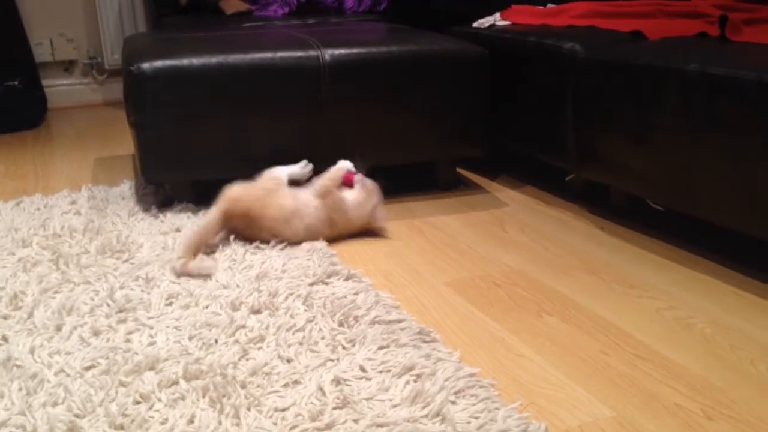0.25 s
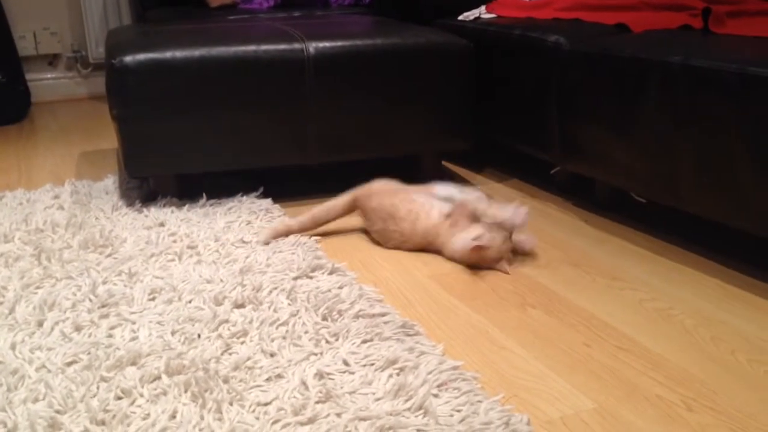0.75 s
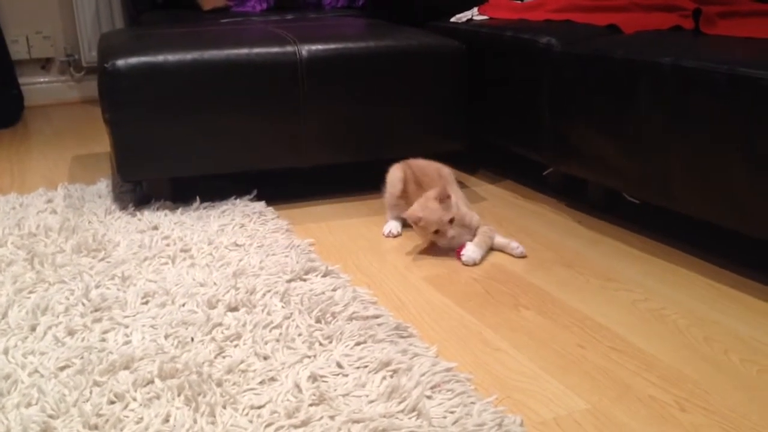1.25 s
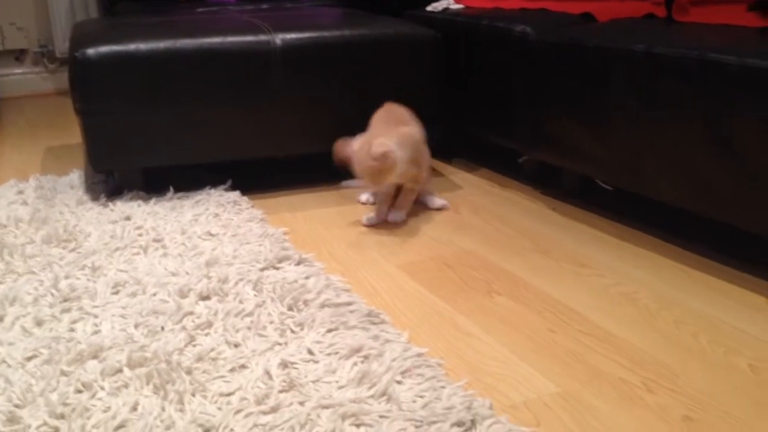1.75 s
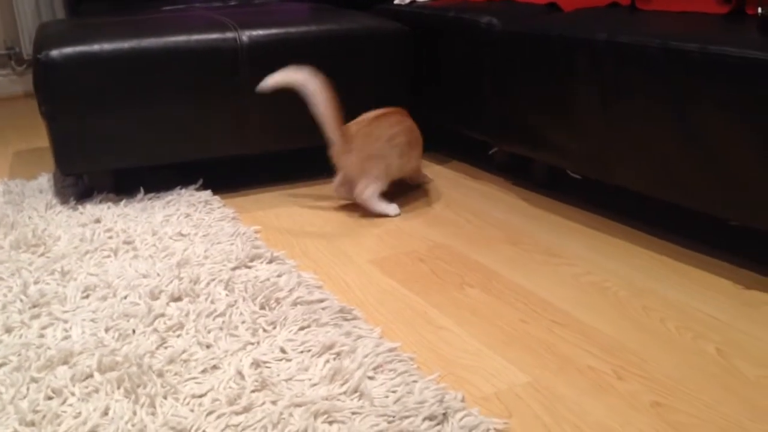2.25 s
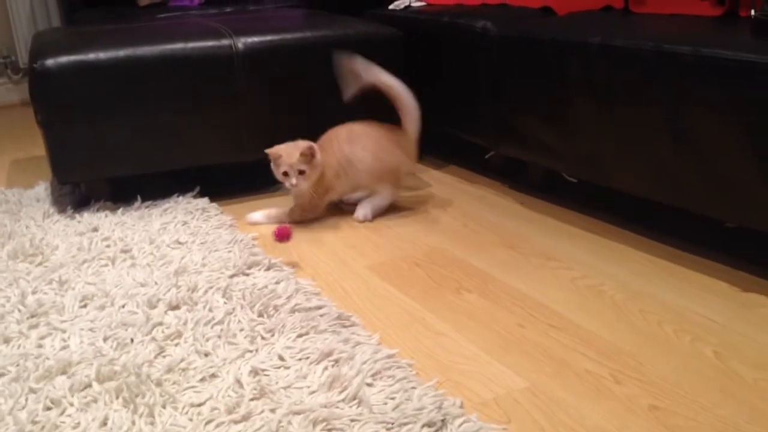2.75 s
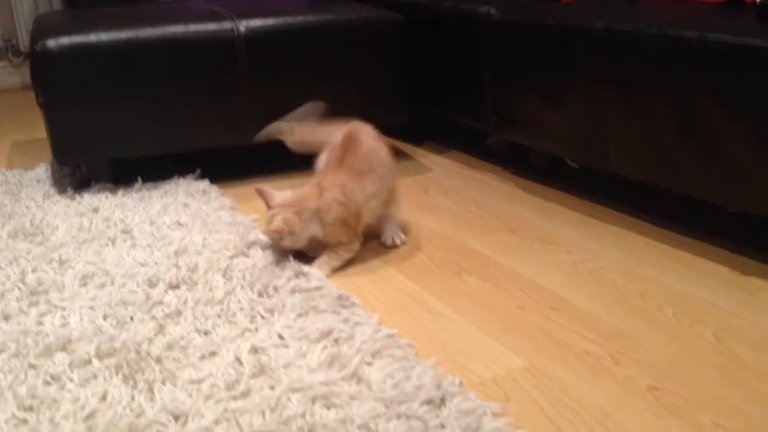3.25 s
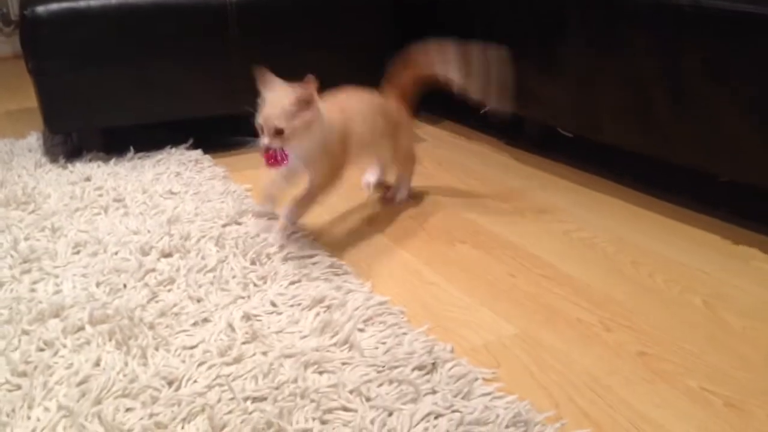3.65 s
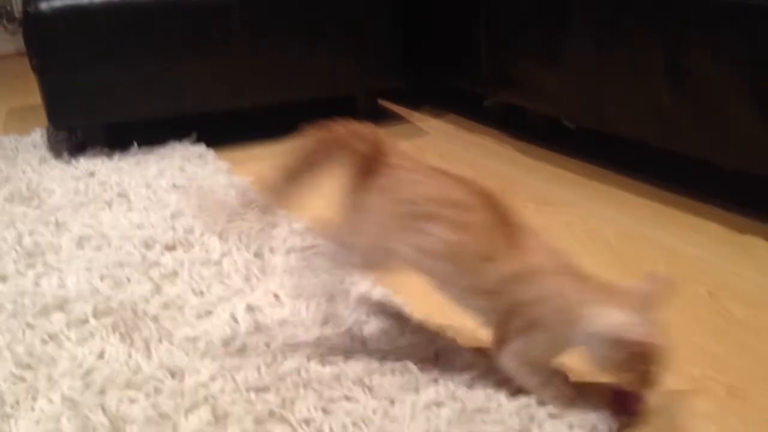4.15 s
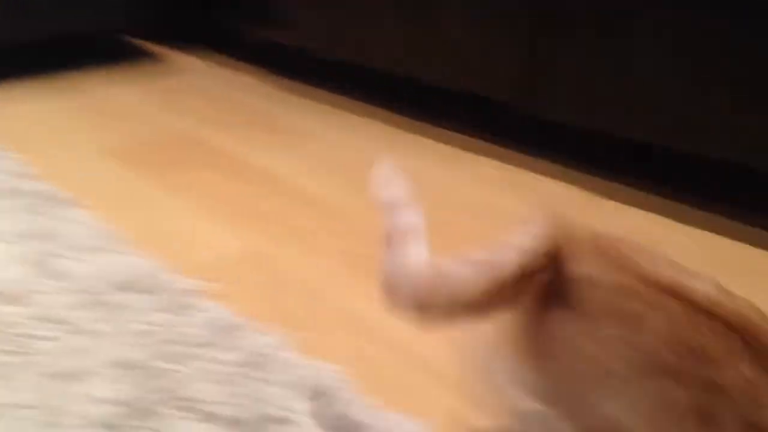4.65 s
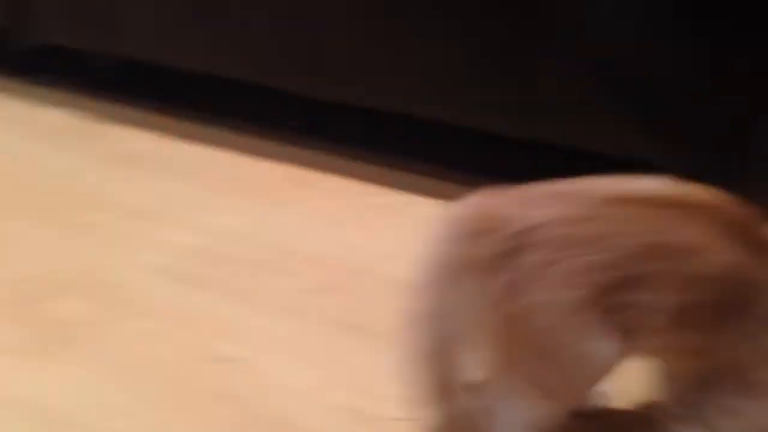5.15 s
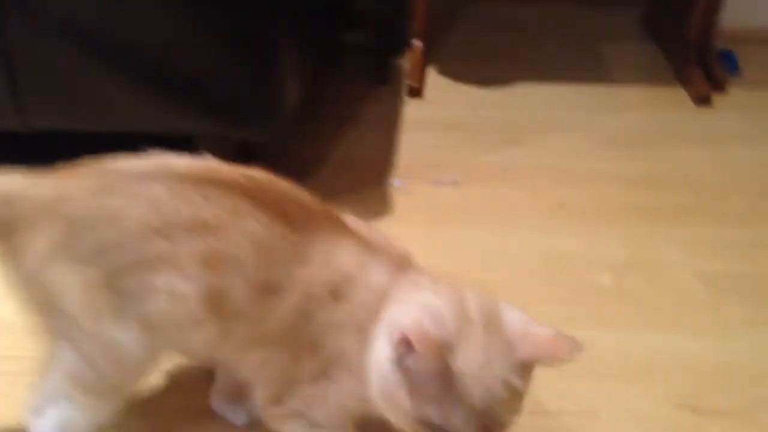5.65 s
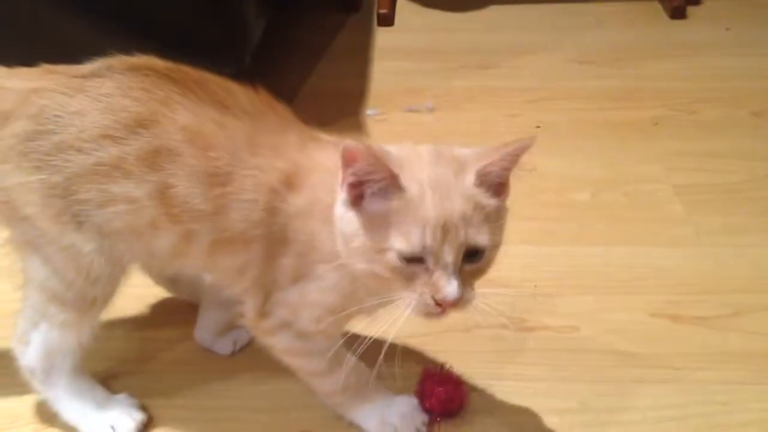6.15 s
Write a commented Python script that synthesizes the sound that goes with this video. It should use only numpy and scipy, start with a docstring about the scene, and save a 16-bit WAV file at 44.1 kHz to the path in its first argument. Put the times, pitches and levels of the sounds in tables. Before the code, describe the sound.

In a small furnished room with a short echo and faint steady hiss, a kitten scrambles on laminate. Very soft pats open, with a light slap and click near 0.4 s and a dull pat near 0.5. At 1.0 s a sharp, woody knock rings from the furniture. After a lull, claw ticks and light skids resume at 1.6-1.9, with a low thump near 2.05 and a scuff at 2.4. A bright claw snap and thud land at 2.8, a crisp click at 3.35 with a thin rasp, then strong raspy scraping around 3.6-3.75. From 4.1 to 4.8 quick hollow paw thumps, clicks and hard skids gallop closer, the room echo receding. A small knock at 5.0 precedes brighter scratches and taps until 5.3. Cloth swishes close to the microphone, swelling to 5.7 and fading quickly by 5.9, leaving hiss to about 6.4.

```python
"""Kitten chasing a soft ball

A kitten chases a soft ball over a laminate floor in a small furnished room.
Pads thump the boards as damped oscillations, claws strike as short coloured noise bursts,
sliding paws skid and rasp by stick-slip, and knocks set the furniture frame ringing.
Cloth rustles near the microphone as swelling noise; the room adds echoes and a short
tail of decaying sparse taps over the steady hiss of the recorder.
"""
import sys
import numpy as np
from scipy import signal
from scipy.fft import rfft, irfft
from scipy.io import wavfile
from scipy.ndimage import uniform_filter1d

SR = 44100
rng = np.random.default_rng(int(sys.argv[2]) if len(sys.argv) > 2 else 0)


def wrap_up_sound(samples):
    """Save the sound to the file named by the first command line argument, as 16-bit audio."""
    columns = np.atleast_2d(samples).T
    # keep every value between -1 and 1, then stretch to whole-number steps
    tamed = np.clip(columns, -1, 1)
    steps = np.round(tamed * 32767).astype(np.int16)
    wavfile.write(sys.argv[1], SR, steps)


N = 282681  # samples in the scene
BURST_SAMPLES = 2048


def gain_of(db):
    """Level definition: decibels to amplitude ratio."""
    return 10 ** (np.asarray(db) / 20)


def evened(x):
    """Power normalisation: scales to rms 1."""
    return x / np.sqrt(np.mean(x ** 2) + 1e-20)


def read(points, hz):
    """Logarithmic pitch scale: interpolates a spectrum table along log frequency."""
    f, value = np.transpose(points)
    return np.interp(np.log(hz + 1), np.log(f + 1), value)


def add(mix, s, sound):
    """Superposition: adds a sound into the mix at time s."""
    part = mix[max(round(s * SR), 0):][:len(sound)]
    part += sound[:len(part)]


def coloured(x, points):
    """Linear filtering: shapes a spectrum by a table, then scales to rms 1."""
    hz = np.fft.rfftfreq(len(x), 1 / SR)
    return evened(irfft(rfft(x) * gain_of(read(points, hz)), len(x)))


def cycles_of(hz, cycles):
    """Damped oscillation: a few cycles under a soft-starting envelope of peak 1."""
    turns = np.arange(6000) / SR * hz
    u = turns * 4 / cycles
    envelope = (u / 2) ** 2 * np.exp(2 - u)
    return envelope * np.sin(2 * np.pi * turns)


def strike(ticks, colour, shape):
    """Impact excitation: a noise burst for the microphone, an equal-energy click for the room."""
    burst = evened(irfft(rfft(ticks) * colour)) * shape
    click = np.roll(irfft(colour), 200)  # delayed so that its symmetric start does not wrap
    return np.array([burst, click * np.linalg.norm(shape) / np.linalg.norm(click)])


# Steady noise of the recorder: (frequency [Hz], relative level [dB per Hz])
HISS_COLOUR = [(15, -56), (25, -0.5), (75, -6.5), (233, -5), (297, -2.5), (340, -2.5), (378, -6.5),
               (469, -5.5), (782, -8), (1020, -10.5), (1110, -12.5), (3630, -8.5), (15500, -13)]


def hiss(level_db=-63.5):
    """Stationary noise: white noise filtered to a fixed spectrum."""
    return gain_of(level_db) * coloured(rng.standard_normal(N), HISS_COLOUR)


# Floor modes: (frequency [Hz], bandwidth [Hz], level [dB])
FLOOR_MODES = [(272, 245, -6), (440.5, 51, -5), (488, 160, -8), (646, 300, -6)]


def boards(force):
    """Modal superposition: floor resonances ringing in parallel under a force."""
    out = np.zeros(len(force))
    for hz, width, db in FLOOR_MODES:
        out += gain_of(db) * signal.lfilter(*signal.iirpeak(hz, hz / width, SR), force)
    return out


# Pads landing: (time [s], thud level [dB], thud frequency [Hz],
#                slap level [dB], slap frequency [Hz], slap length [cycles])
LANDINGS = [(0.003, -51, 159, -66, 427, 3.1), (0.027, -60, 128, -78, 380, 1.8),
            (0.398, -59, 316, -44, 504, 2.4), (0.536, -40.5, 310, -45, 425, 2.3),
            (0.948, -63, 228, -65, 428, 2), (1.014, -60, 295, -23.5, 763, 3.9),
            (1.586, -61, 213, -61, 466, 3.2), (1.681, -52, 285, -65, 390, 2.7),
            (2, -47.5, 328, -43, 430, 2.3), (2.039, -46, 153, -75, 393, 2.5),
            (2.057, -32, 154, -46.5, 407, 2), (2.226, -58, 158, -52.5, 590, 2.1),
            (2.27, -61, 175, -55, 460, 2), (2.408, -50, 155, -55.5, 474, 2),
            (2.616, -51, 235, -42.5, 460, 3), (2.791, -31.5, 253, -38, 452, 4.2),
            (2.932, -69, 278, -53, 576, 3.2), (2.969, -50.5, 246, -48, 443, 1.9),
            (3.11, -50.5, 256, -42, 450, 1.14), (3.339, -51, 313, -45, 572, 2.6),
            (3.668, -66, 323, -44.5, 602, 4.3), (3.682, -69, 323, -41, 600, 9),
            (3.965, -49, 313, -45, 447, 1.6), (4.101, -36.5, 300, -37.5, 490, 3.5),
            (4.115, -39, 297, -46, 360, 4.4), (4.143, -54, 332, -44, 476, 4.4),
            (4.152, -30.5, 345, -24.5, 500, 1.9), (4.161, -34, 300, -45.5, 303, 2.3),
            (4.196, -54, 330, -49, 450, 2.2), (4.209, -58, 328, -48, 402, 4.8),
            (4.286, -38, 345, -43, 497, 5), (4.444, -48, 265, -39.5, 537, 5.9),
            (4.494, -50, 326, -38, 513, 5.4), (4.646, -30, 296, -24.5, 463, 2.36),
            (4.654, -37, 186, -24, 554, 2.1), (4.667, -40.5, 200, -45, 520, 1.5),
            (4.686, -50, 322, -41.5, 480, 4.2), (4.714, -62, 300, -47, 436, 3.7),
            (4.744, -31.5, 258, -36.5, 555, 4.1), (4.759, -34, 168, -35.5, 530, 2.4),
            (4.798, -40.5, 179, -38, 424, 1.5), (5.012, -39, 235, -58, 700, 3),
            (5.019, -35, 267, -42, 706, 1.2), (5.043, -51, 328, -43.5, 730, 3),
            (5.234, -39.5, 248, -42.5, 485, 1.1), (5.279, -36.5, 265.4, -39, 437, 4.1)]


def thumps(boards_db=-6, squash_s=0.002724, thud_cycles=1.41):
    """Forced vibration: a pad squashes, then the weight's thud and the slap excite the boards."""
    out = np.zeros(N)
    for s, thud_db, thud_hz, slap_db, slap_hz, slap_cycles in LANDINGS:
        add(out, s + squash_s, gain_of(thud_db) * cycles_of(thud_hz, thud_cycles))
        add(out, s + squash_s, gain_of(slap_db) * cycles_of(slap_hz, slap_cycles))
    return out + gain_of(boards_db) * boards(out)


# Near walls returning each landing: (delay [s], level [dB])
WALL_RETURNS = [(0.015, -15.5), (0.047, -23.5)]


def echoes(x):
    """Specular reflection: delayed, weaker copies of the low landings."""
    out = np.zeros(N)
    for s, db in WALL_RETURNS:
        add(out, s, gain_of(db) * x)
    return out


# Reverberation times of the room: (frequency [Hz], T60 [s])
DECAY_TIMES = [(100, 0.2), (300, 0.39), (700, 0.35), (2000, 0.37), (4000, 0.26), (8000, 0.35),
               (15000, 0.52)]


def room(x, turns_per_s=1.3):
    """Statistical reverberation: sparse random-sign taps, decaying by band, in three shifting tails."""
    at = np.arange(300, 22000, 20) + rng.integers(0, 20, (3, 1085))  # one tap per 20 samples
    taps = np.zeros((3, 22050))
    np.put_along_axis(taps, at, rng.choice([-1., 1.], at.shape), 1)
    hz, t, bands = signal.stft(taps, SR, nperseg=256)
    decay = gain_of(-60 * t / read(DECAY_TIMES, hz)[:, None])
    tails = signal.istft(bands * decay, SR, nperseg=256)[1]
    turn = 2 * np.pi * (np.arange(N) / SR * turns_per_s + np.arange(3)[:, None] / 3)
    shares = np.sqrt(2 / 3) * np.cos(turn)  # the three powers always sum to 1
    wet = signal.fftconvolve(x * shares, tails / np.linalg.norm(tails[0]), axes=1)
    return wet[:, :N].sum(0)


# The room fades as the kitten comes near: (time [s], room level [dB])
ROOM_LEVEL = [(0, 10), (3, 8), (4, 9), (5, 1), (6.4, 2)]


def room_db(t):
    """Direct-to-reverberant balance: the room level at time t, in decibels."""
    return np.interp(t, *np.transpose(ROOM_LEVEL))


# Paws sliding: (peak time [s], scrape level [dB], swell [ms per 20 dB], fade [ms per 20 dB],
#                board rumble level [dB], claw tip share [0-1], pad share [0-1])
SLIDES = [(0.34, -72.5, 150, 100, -71, 0, 0.5), (3.21, -67.5, 100, 153, -63, 0.2, 0),
          (5.06, -69, 100, 150, -61, 0.1, 0.84), (0.916, -58.5, 29, 43, -73, 0.3, 0.4),
          (1.59, -56, 47, 28, -68.5, 0.1, 0.25), (1.692, -53, 22, 129, -59.5, 0.12, 0.1),
          (1.846, -64, 28, 98, -78, 0.55, 0), (2.003, -58, 7, 84, -55, 0.15, 0.23),
          (2.234, -64, -2, 30, -53, .02, 0.1), (2.272, -61, 9, 60, -63, .02, 0.25),
          (2.436, -50, 11, 91, -56.5, 0, 0.64), (2.68, -54.5, 2, 200, -67, 0.06, 0.24),
          (2.73, -50, 59, 18, -72, 0.07, 0), (2.775, -68, 100, 64, -74, .2, 0.5),
          (2.817, -53.5, 20, 191, -55.5, 0.94, 0.1), (2.936, -59, 12, 76, -59, 0, 0.63),
          (3.03, -67, 100, 156, -64, 0.8, 0.4), (3.346, -56, 4, 97, -52.5, 0.6, .05),
          (3.466, -51, 139, 128, -62.5, 0.48, 0.17), (3.57, -62, 47, 100, -56, 0.1, .2),
          (3.653, -38.5, 46, 87, -48.5, 0.34, 0.26), (3.697, -38.5, 55, 84, -50.5, 0.48, 0.28),
          (3.745, -52, 30, 123, -72, 0.15, 0), (4.298, -45, 9, 30, -48.5, 0.2, 0.16),
          (4.329, -57, 32, 303, -60, 0.5, 0.14), (4.411, -57.5, 35, 84, -60, 0.4, 0.16),
          (4.45, -34.5, 6.5, 63, -47.5, 0.32, 0.19), (4.497, -37, 36, 88, -54.5, 0.42, 0.19),
          (4.656, -37.5, 15, 76, -46, 0.2, 0.22), (4.79, -58.5, 63, 206, -57.5, .2, 0.23),
          (4.895, -54, 130, 138, -61.5, 0.7, 0.32), (5.14, -51.5, 196, 198, -63, 0.4, .1),
          (5.24, -52.5, 100, 144, -66, 0, .1), (5.289, -54.5, 42, 95, -54, 0.3, 0.3)]
# Colours of scraping, claw tips and dragged pad: (frequency [Hz], relative level [dB per Hz])
SCRAPE_COLOUR = [(300, -36), (1000, -21), (2200, -35), (3100, -5), (4000, -5), (5300, -13.5), (9300, -41.5),
                 (15500, -82)]
TIP_COLOUR = [(2000, -7.5), (4500, 8.5), (7000, 18.5), (11000, 9), (15500, -4)]
PAD_COLOUR = [(600, -31), (1300, 11), (2200, 16.5), (3200, -5), (5000, -43)]


def skids(slips_per_s=7000, spread_db=2.2, grip_db=3, grip_ms=16.4, sheen_hz=9600, sheen_slope=0.83):
    """Stick-slip friction: dense uneven ticks, with rubbing noise rumbling in the boards."""
    t = np.arange(N) / SR
    size_db = spread_db * np.minimum(rng.exponential(1, N), 3)
    slips = rng.standard_normal(N) * (rng.random(N) < slips_per_s / SR) * gain_of(size_db)
    scrape = coloured(slips, SCRAPE_COLOUR)
    tips = coloured(slips, TIP_COLOUR)
    pad = coloured(slips, PAD_COLOUR)
    rumble = evened(boards(boards(rng.standard_normal(N))))

    # above sheen_hz the tips gain sheen_slope dB for each dB that the room fades
    sheen = signal.filtfilt(*signal.butter(2, sheen_hz, "high", fs=SR), tips)
    tips = tips + sheen * (gain_of(-sheen_slope * room_db(t)) - 1)

    power = np.zeros((4, N))
    for s, db, swell_ms, fade_ms, rumble_db, tip_share, pad_share in SLIDES:
        near = slice(max(round((s - 0.6) * SR), 0), round((s + 0.8) * SR))
        ms = (t[near] - s) * 1000
        push = gain_of(-20 * np.maximum(-ms / max(swell_ms, 1), ms / fade_ms))
        parts = gain_of([db, db, db, rumble_db]) * [1, tip_share, pad_share, 1]
        power[:, near] += (parts[:, None] * push) ** 2

    # the grip catches and lets go at random: smoothed noise as a level in dB
    span = round(grip_ms * SR / 1000)
    grip = evened(uniform_filter1d(uniform_filter1d(rng.standard_normal((4, N)), span), span))
    return (np.sqrt(power) * gain_of(grip_db * grip) * [scrape, tips, pad, rumble]).sum(0)


# Claws striking: (time [s], burst level [dB], centre frequency [Hz], spread [octaves],
#                  decay time [ms], tip snap level [dB])
CLAW_STRIKES = [(0.4, -35, 1170, 0.45, 3.6, -65), (0.399, -46, 3400, 0.7, 6.6, -74),
                (1.017, -26, 4140, 0.46, 4.9, -58), (3.348, -24, 3050, 0.2, 3.4, -70),
                (3.355, -33, 2340, 0.25, 6.4, -70), (0.9003, -49, 4070, 0.73, 5.7, -68),
                (1.587, -44, 3700, 0.53, 3.1, -70), (1.684, -30, 3520, 0.42, 2.9, -71),
                (1.7177, -41, 1980, 0.3, 3.2, -62), (1.841, -48, 4130, 0.34, 4.9, -51),
                (1.8677, -49, 4060, 0.39, 6.9, -68), (2.0017, -56, 4140, .7, 10, -59),
                (2.233, -56, 3730, 0.46, 3.6, -68), (2.268, -50.5, 3300, 0.46, 3.8, -69),
                (2.4345, -34, 3320, 0.39, 4.1, -69), (2.6184, -40.5, 1120, 1.3, 4.4, -73),
                (2.6821, -42.5, 4080, 0.26, 5.9, -61), (2.7164, -40, 3900, 0.34, 7.3, -59),
                (2.811, -19.5, 4050, 0.34, 6, -24.5), (2.9328, -33.5, 3720, 0.32, 3.3, -72),
                (3.111, -54, 3460, 1.1, 4.5, -55), (3.323, -47.5, 3950, 0.77, 9.2, -56),
                (3.3386, -18, 4470, 0.56, 3.2, -51), (3.4306, -37, 4830, 0.28, 4.2, -60),
                (3.693, -27, 4360, 0.39, 8.6, -45), (4.008, -51, 4100, 0.4, 5.3, -73),
                (4.1042, -49, 1330, 1.1, 8.1, -56), (4.1582, -36.5, 1520, 1.33, 5.3, -62),
                (4.2928, -31.5, 4600, 0.58, 3.5, -36.5), (4.351, -42, 5050, 0.24, 6.4, -55),
                (4.45, -39, 3350, 0.52, 4.9, -42), (4.651, -27.5, 3140, 1.3, 3.7, -55),
                (4.661, -32, 3930, 1.2, 3.5, -57), (4.7557, -42, 4500, 1.2, 10.6, -34.5),
                (4.8912, -44, 3280, 0.58, 7.1, -48), (5.1337, -47, 3870, 0.69, 9.8, -44),
                (5.163, -41.5, 3950, .6, 7.3, -56), (5.2027, -38, 5460, 1.3, 7.3, -31.5),
                (5.2427, -49, 3540, 0.5, 4.5, -42.5), (5.2936, -37, 3560, 0.83, 3.3, -47)]


def claws(tip_ms=0.72, upper_spread=0.59, near_tilt=0.4):
    """Impact radiation: a noise burst coloured around a centre, led by the snap of the tip."""
    out = np.zeros((N, 2))  # microphone, room
    t = np.arange(BURST_SAMPLES) / SR
    f = np.fft.rfftfreq(BURST_SAMPLES, 1 / SR) + 1
    for s, db, hz, octaves, ms, tip_db in CLAW_STRIKES:
        ticks = rng.standard_normal(BURST_SAMPLES)
        # the colour falls faster above the centre than below
        spread = octaves * np.where(f < hz, 1, upper_spread)
        colour = 1 / (1 + (np.log2(f / hz) / spread) ** 2) ** 1.11
        shape = (1 - np.exp(-t / 0.0017)) * np.exp(-t * 1000 / ms)
        # tips brighten by near_tilt dB per octave for each dB that the room fades
        tilt_db = -near_tilt * room_db(s) * np.log2(f / 7000)
        tip_colour = gain_of(read(TIP_COLOUR, f) + tilt_db)
        tip = strike(ticks, tip_colour, np.exp(-t * 1000 / tip_ms))
        tip[0] += np.roll(tip[1], -170)  # the first contact is one clean click
        add(out, s, (gain_of(db) * strike(ticks, colour, shape) + gain_of(tip_db) * tip).T)
    return out.T


# Paws knocking on the furniture frame: (time [s], burst level [dB], brightness [dB per octave])
FRAME_KNOCKS = [(1.017, -23, 6), (5.018, -31, -5)]
# Colour of a knock: (frequency [Hz], relative level [dB per Hz])
FRAME_COLOUR = [(180, -43), (300, 3), (390, -4), (421, -3), (723, 11.5), (1000, -7), (1180, 1), (1740, -10),
                (2030, -5.5), (2230, -12), (3230, -14.5), (12000, -86), (15600, -80), (22000, -120)]
# The frame rings on after a knock: (frequency [Hz], relative level [dB], T60 [s])
FRAME_MODES = [(686, -12, 0.23), (752, -12, 0.34), (790, -6, 0.32), (1340, -8, 0.37), (2060, -6.5, 0.32),
               (2000, -17, 0.42), (2340, -6, 0.13)]


def knocks(crack_ms=7.55, ring_db=-45.5):
    """Impulse response of a padded frame: a dense short crack, then decaying modes."""
    out = np.zeros((N, 2))  # microphone, room
    t = np.arange(BURST_SAMPLES) / SR
    f = np.fft.rfftfreq(BURST_SAMPLES, 1 / SR) + 1
    for s, db, bright_db in FRAME_KNOCKS:
        ticks = rng.standard_normal(BURST_SAMPLES)
        colour = gain_of(read(FRAME_COLOUR, f) + bright_db * np.log2(f / 1000))
        shape = (1 - np.exp(-t / 0.0016)) * np.exp(-(t * 1000 / crack_ms) ** 2)
        add(out, s, gain_of(db) * strike(ticks, colour, shape).T)
    u = np.arange(SR // 2) / SR
    ring = np.zeros(len(u))
    for hz, db, t60 in FRAME_MODES:
        ring += gain_of(db - 60 * u / t60) * np.sin(2 * np.pi * hz * u)
    out[:, 0] += gain_of(ring_db) * signal.oaconvolve(out[:, 1], ring)[:N]
    return out.T


# A dragged claw holds one narrow pitch: (start [s], length [s], frequency [Hz],
#                                         bandwidth of each of two passes [Hz], level [dB])
CLAW_DRAGS = [(3.347, 0.055, 3100, 500, -45.5), (3.463, .018, 4200, 900, -46),
              (3.598, 0.098, 4100, 500, -42.5), (3.677, 0.04, 3300, 400, -46),
              (3.689, 0.026, 4260, 500, -44), (3.737, .02, 4080, 900, -42)]


def rasps(slips_per_s=2000, spread_db=0.5, top=0.44):
    """Resonance driven by stick-slip: uneven slips ring one narrow mode as the claw drags."""
    out = np.zeros(N)
    t = np.arange(4410) / SR
    for s, length, hz, width, db in CLAW_DRAGS:
        slipping = rng.random(len(t)) < slips_per_s / SR
        size_db = spread_db * np.minimum(rng.exponential(1, len(t)), 2)
        slips = rng.standard_normal(len(t)) * slipping * gain_of(size_db)
        peak = signal.iirpeak(hz, hz / width, SR)
        rung = evened(signal.lfilter(*peak, signal.lfilter(*peak, slips)))
        envelope = np.interp(t / length, [0, top, 1], [0, 1, 0])  # loudest at share top
        add(out, s, gain_of(db) * rung * envelope)
    return out


# Colour of rustling cloth: (frequency [Hz], relative level [dB per Hz])
CLOTH_COLOUR = [(120, -41), (200, -15), (437, -3), (728, -9.5), (783, -7), (1380, -8), (3420, -5),
                (15500, -19)]


def rustle(start_s=5.34, top_s=5.7, level_db=-52.5):
    """Amplitude-modulated noise: a smooth broad swish that swells and fades."""
    t = np.arange(N) / SR
    onset_db = 800 * np.maximum(start_s - t, 0)  # slopes in dB per second
    swell_db = 18 * np.maximum(top_s - t, 0)
    fade_db = 148 * np.maximum(t - top_s, 0)
    level = gain_of(level_db - onset_db - swell_db - fade_db)
    return level * coloured(rng.standard_normal(N), CLOTH_COLOUR)


def scene():
    """Superposition of direct and reverberant sound: each source has its share of the room."""
    low = thumps()
    slide = skids() + rasps()
    high, high_room = claws()
    knock, knock_room = knocks()
    fed = gain_of(-13) * low + gain_of(-12.5) * high_room
    fed += gain_of(-13.5) * knock_room + gain_of(-14) * slide
    tail = room(gain_of(room_db(np.arange(N) / SR)) * fed)
    direct = low + high + knock + slide
    return (direct + echoes(low) + tail + rustle() + hiss())[None]


def record(dry):
    """Band limiting: the small microphone drops the deep bass, then a low-pass ends the treble."""
    thin = signal.lfilter(*signal.butter(2, 60, "high", fs=SR), dry)
    low_pass = signal.firwin(511, 15500, window=("kaiser", 9), fs=SR)
    return signal.oaconvolve(thin, low_pass[None], "same")


dry = scene()
out = record(dry)
wrap_up_sound(out)
```